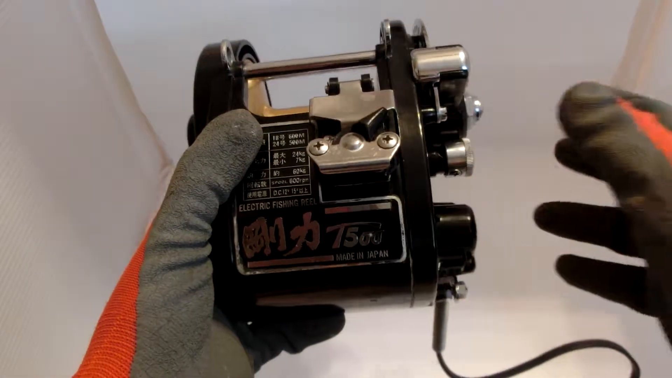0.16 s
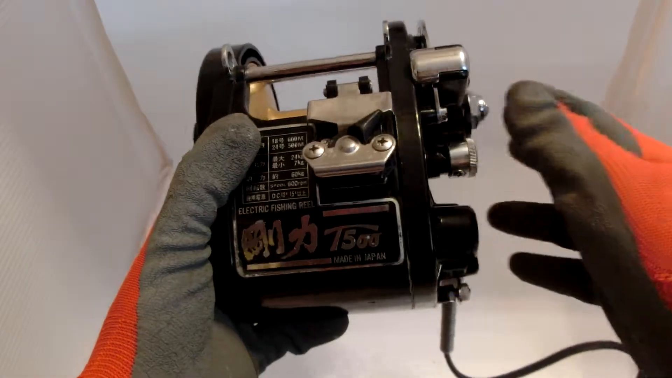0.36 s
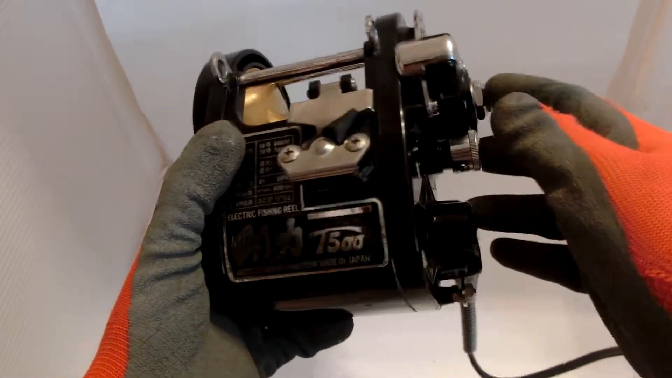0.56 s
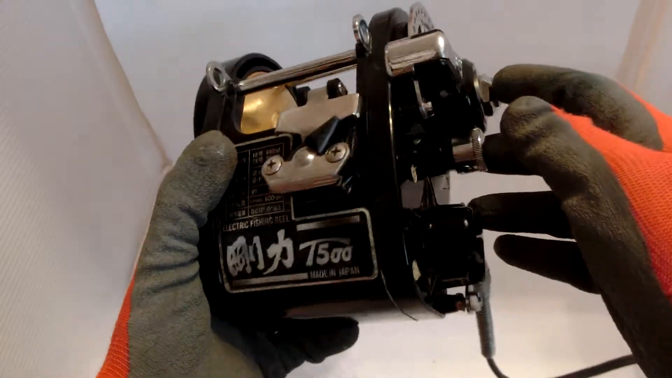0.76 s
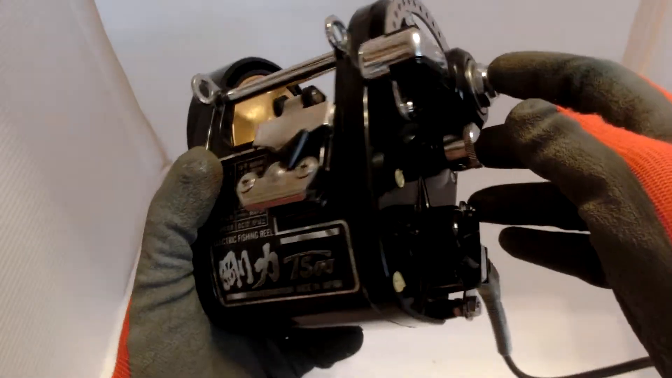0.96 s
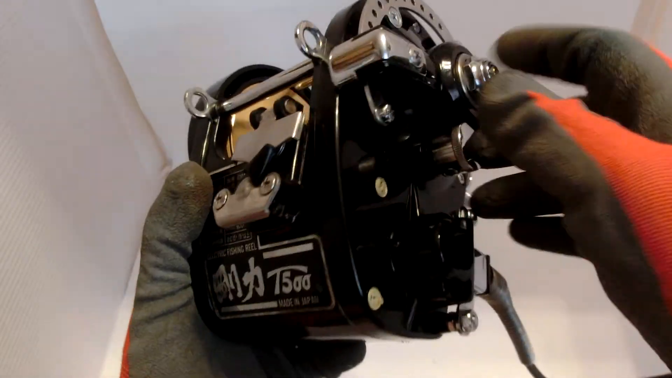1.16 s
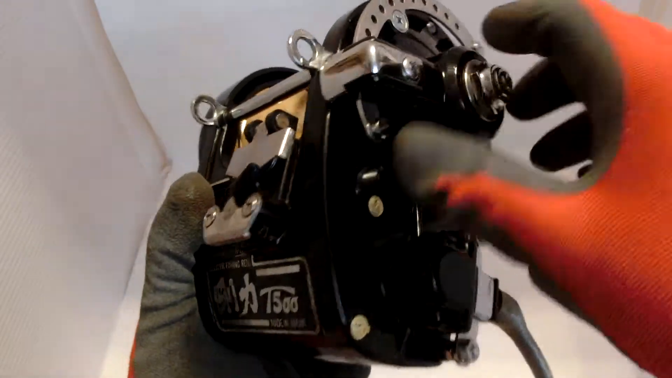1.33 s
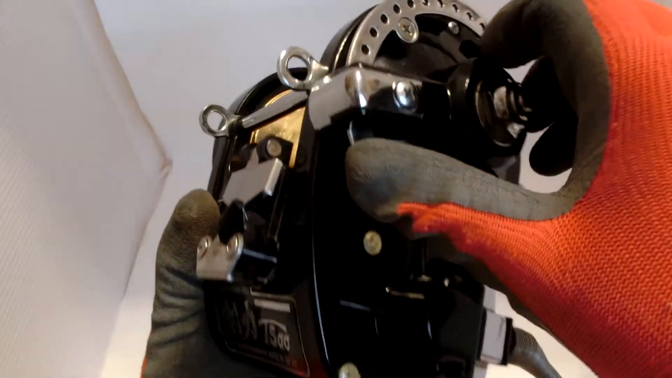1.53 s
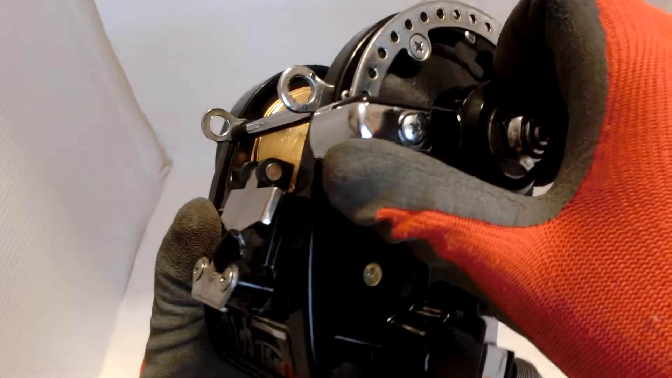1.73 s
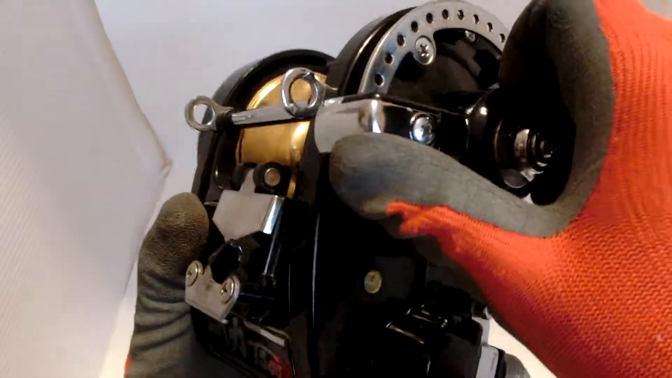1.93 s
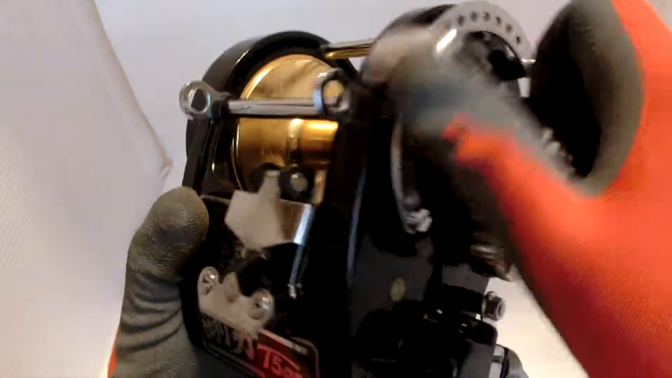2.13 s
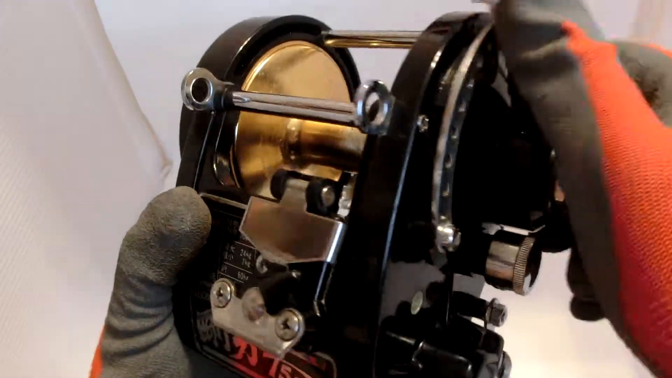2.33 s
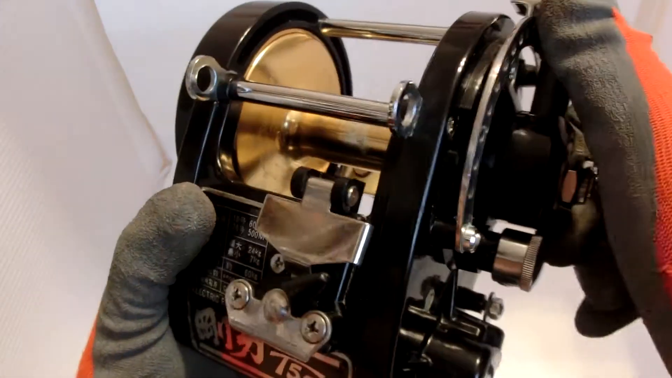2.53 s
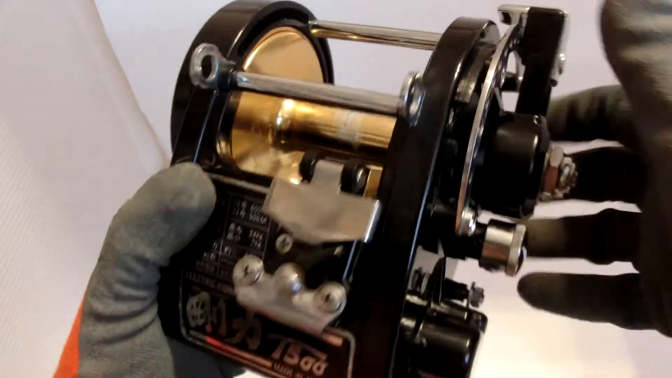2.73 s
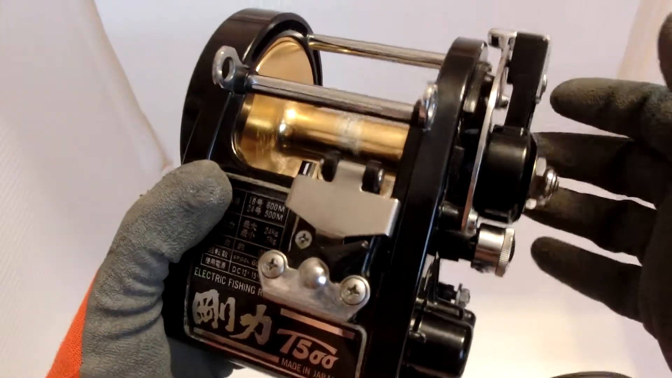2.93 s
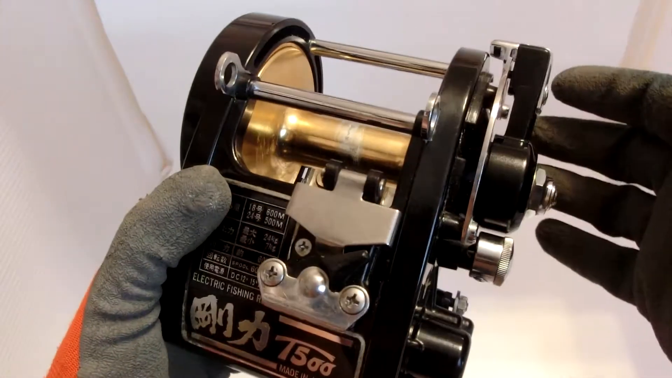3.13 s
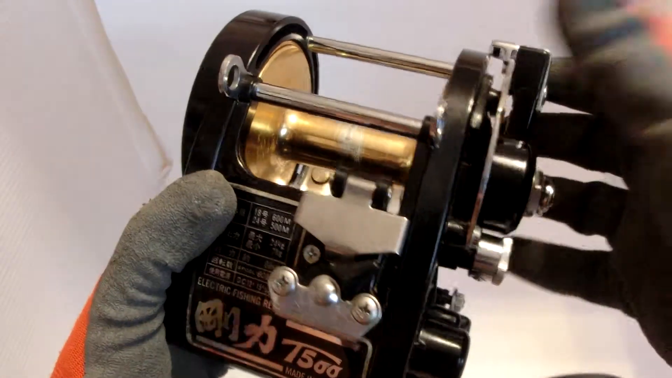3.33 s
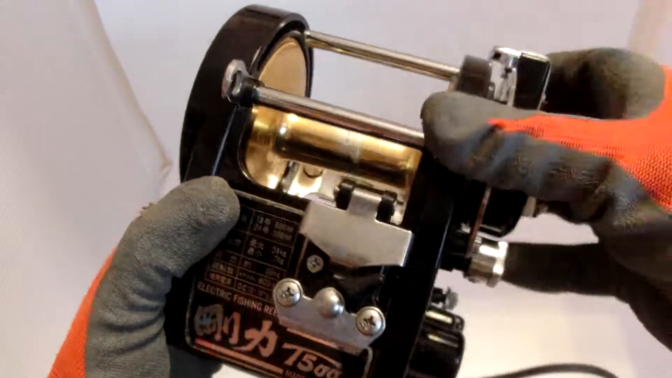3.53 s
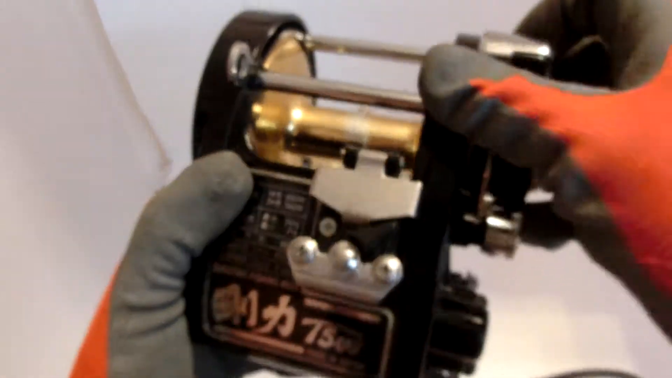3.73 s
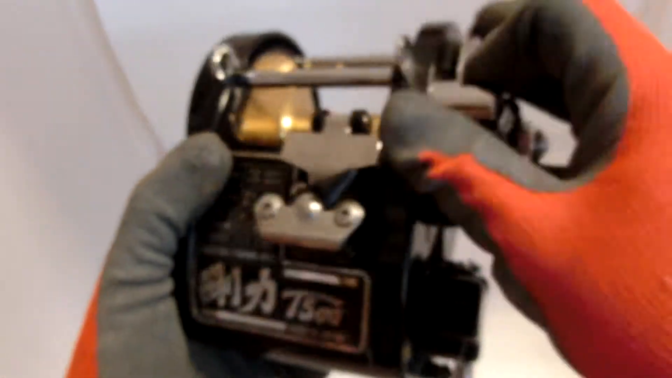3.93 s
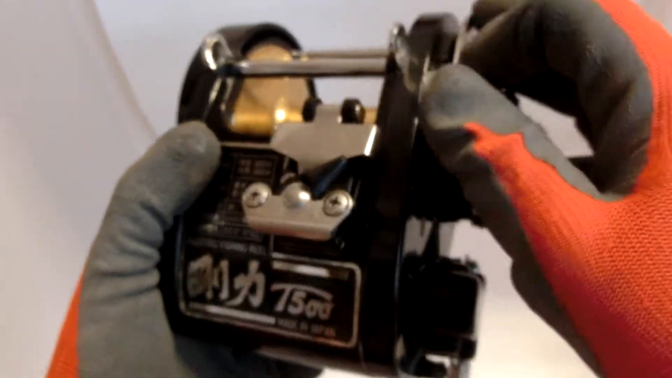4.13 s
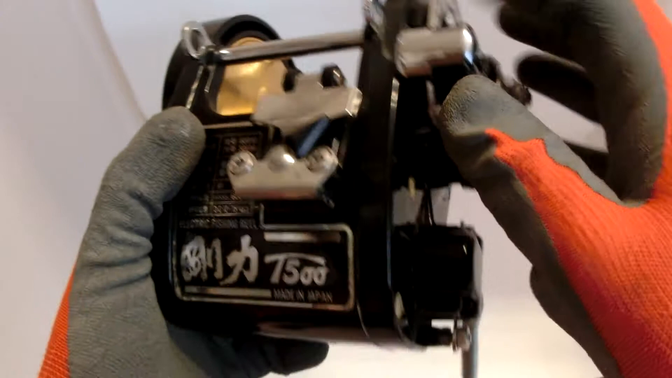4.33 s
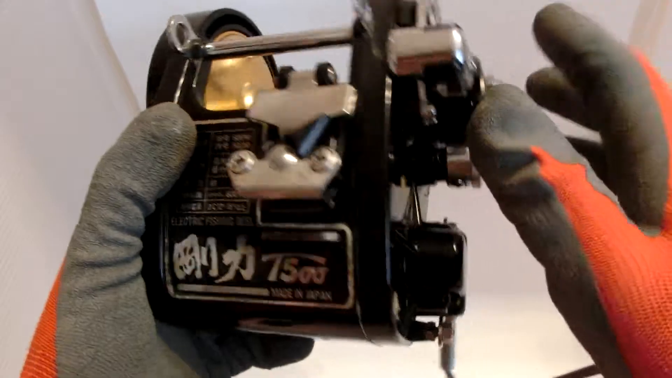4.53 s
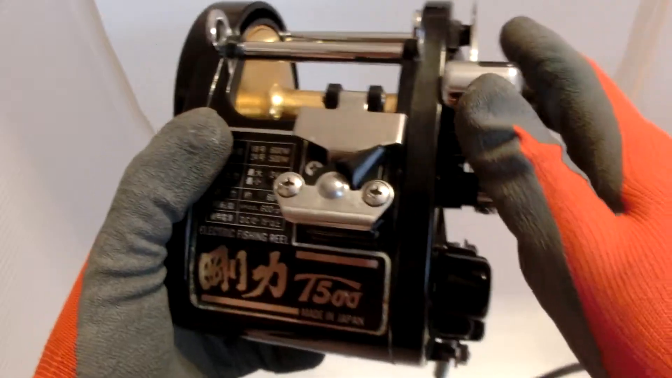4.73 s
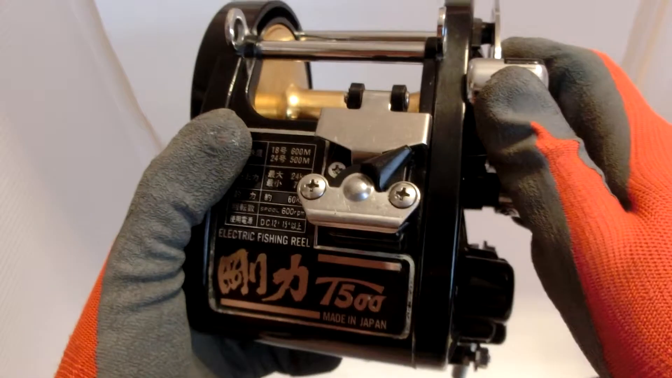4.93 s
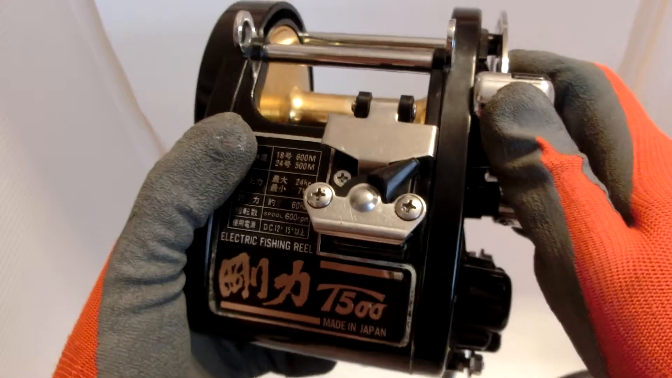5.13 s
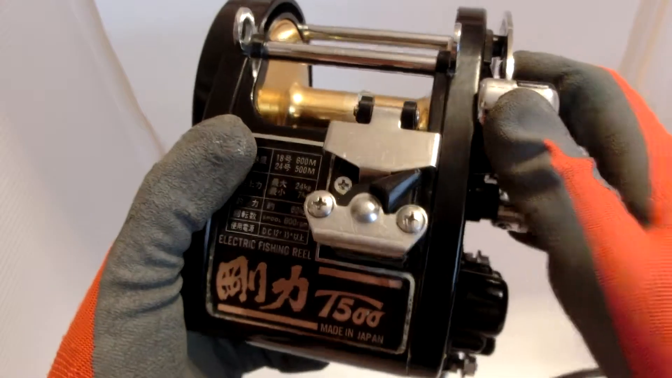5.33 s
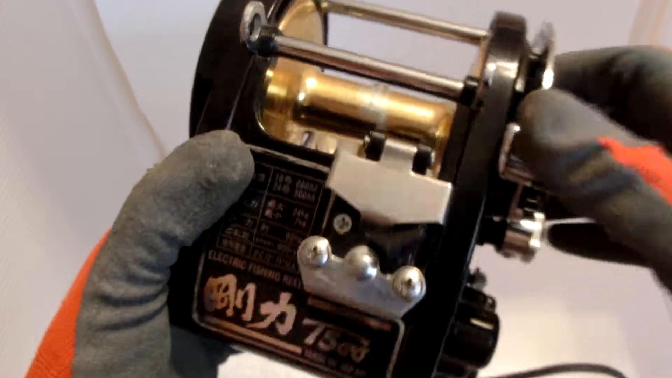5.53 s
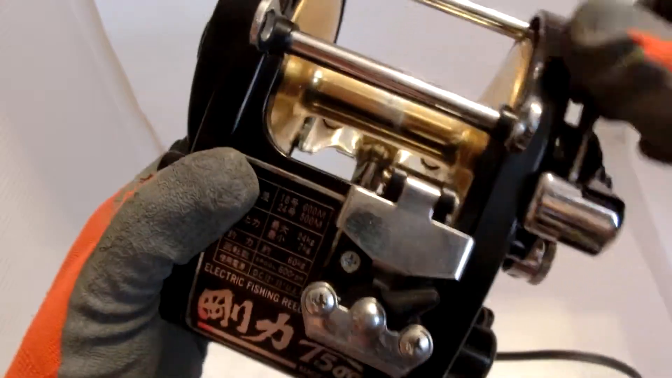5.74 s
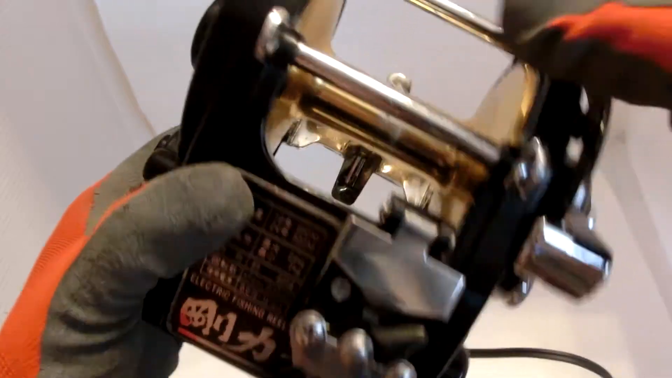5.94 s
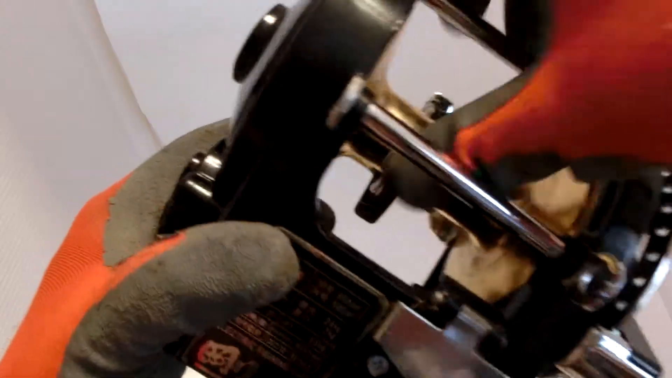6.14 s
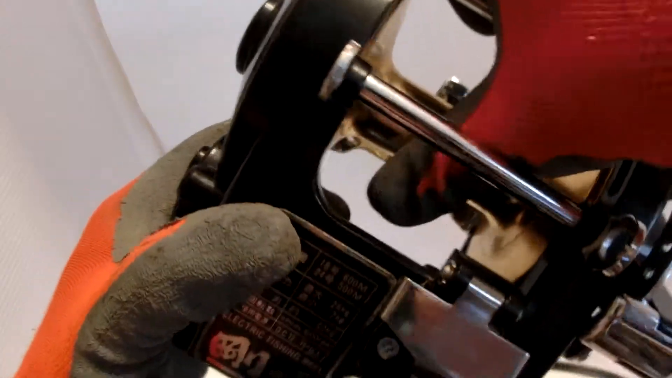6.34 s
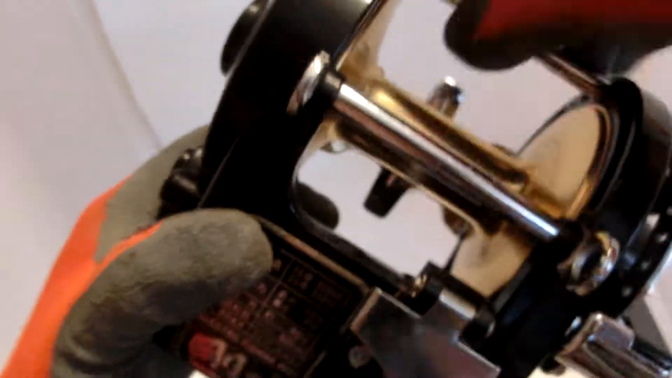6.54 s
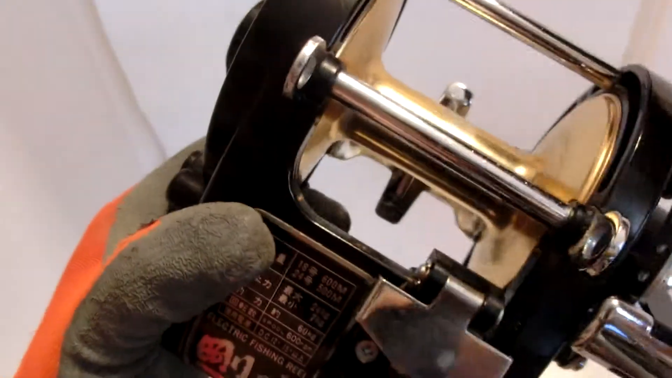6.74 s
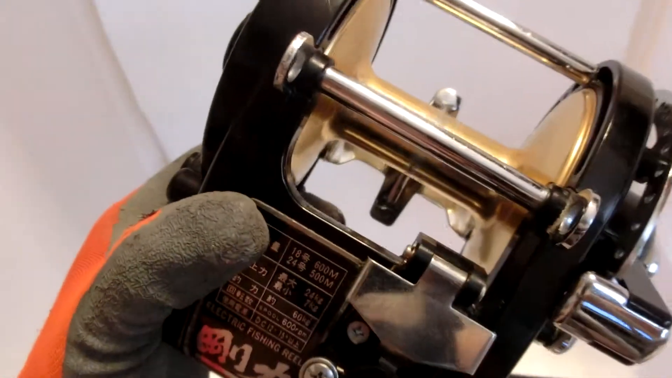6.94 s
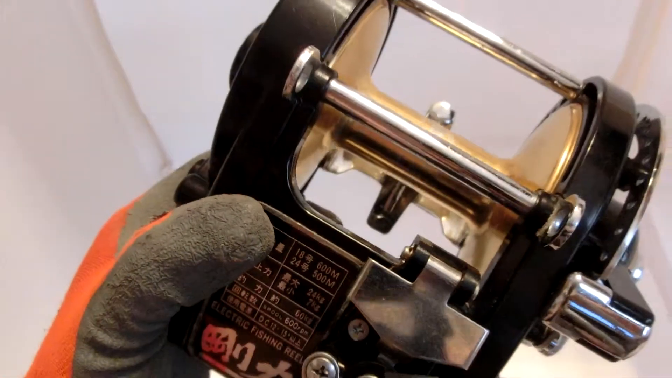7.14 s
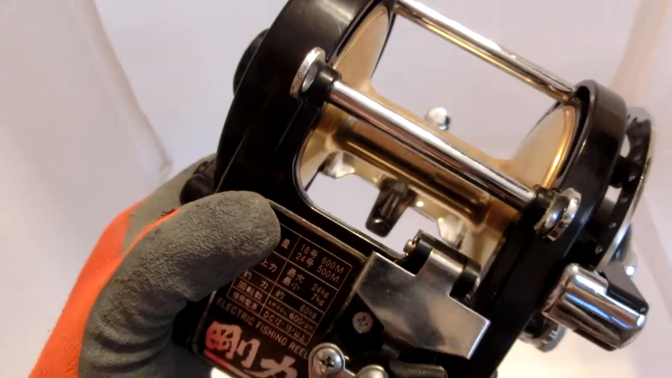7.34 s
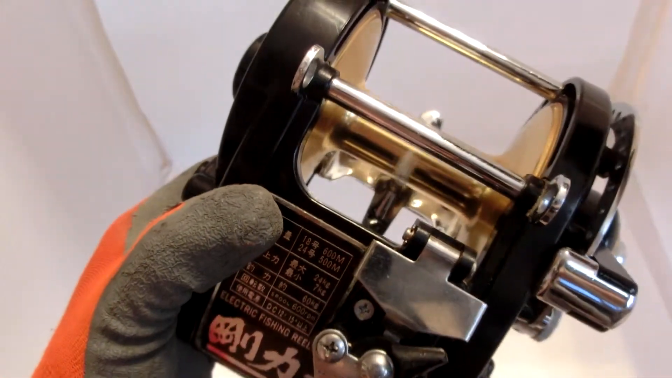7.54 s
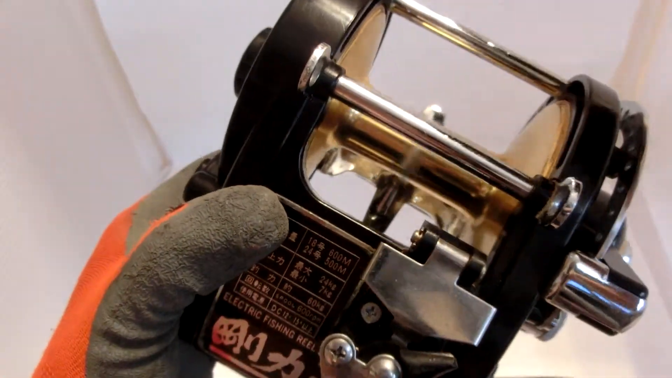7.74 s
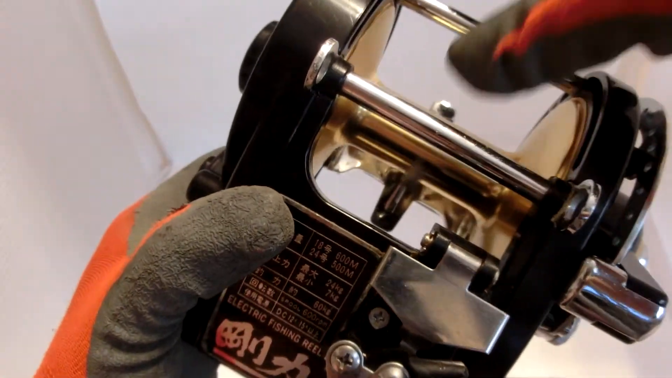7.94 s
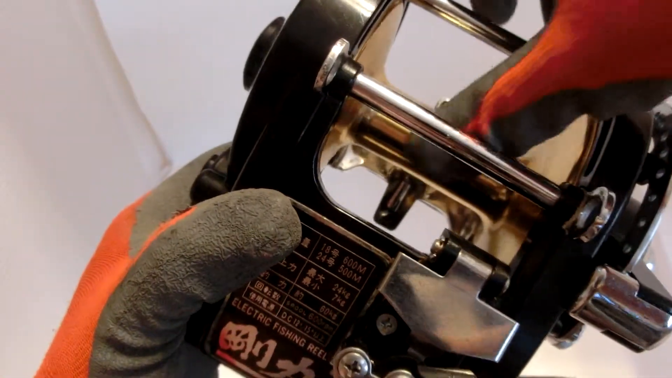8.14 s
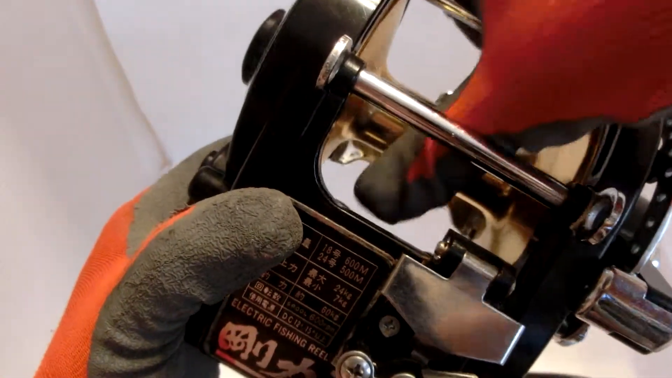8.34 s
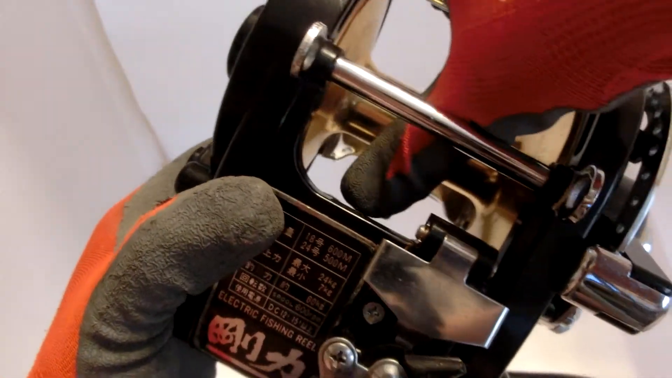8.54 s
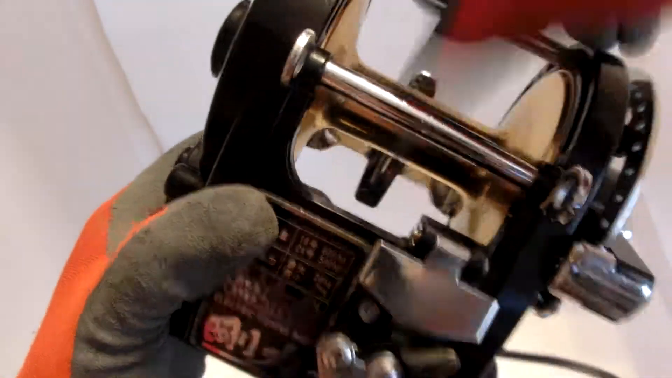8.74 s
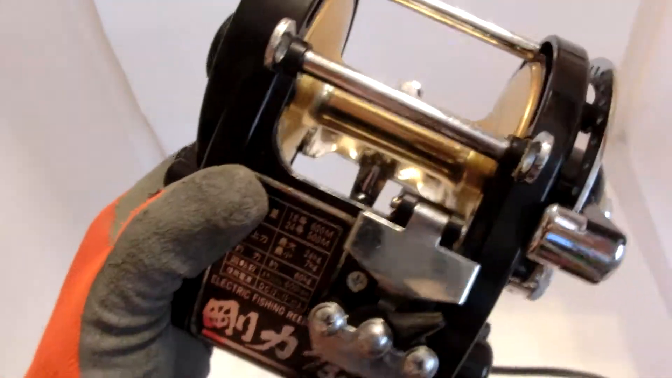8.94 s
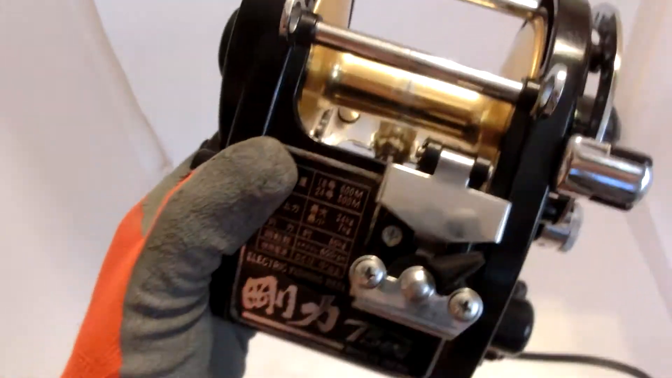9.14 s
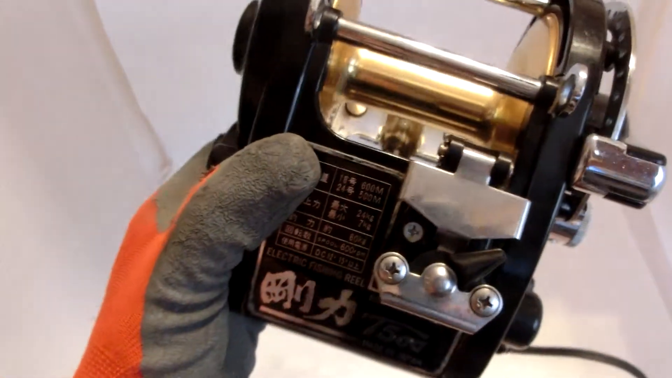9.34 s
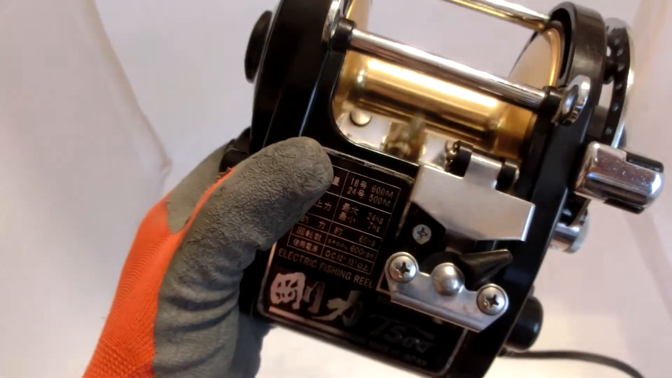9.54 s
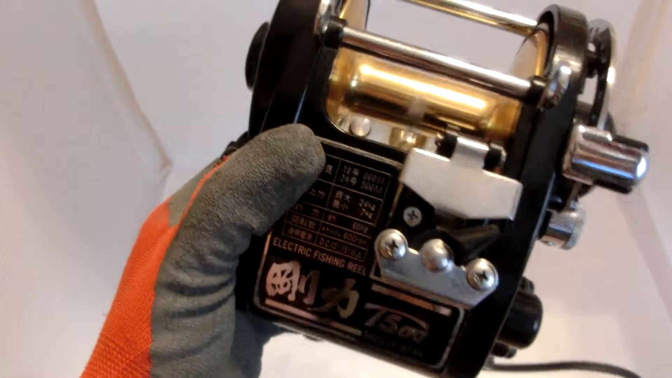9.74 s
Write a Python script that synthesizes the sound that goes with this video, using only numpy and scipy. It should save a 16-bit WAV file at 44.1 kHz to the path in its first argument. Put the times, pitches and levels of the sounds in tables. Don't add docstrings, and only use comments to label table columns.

```python
import sys
import numpy as np
from scipy import signal
from scipy.fft import rfft, irfft, next_fast_len
from scipy.io import wavfile
from scipy.ndimage import uniform_filter1d, map_coordinates

SR = 44100
rng = np.random.default_rng(int(sys.argv[2]) if len(sys.argv) > 2 else 0)


def amplitude_ratio(level_db):
    exponent = np.asarray(level_db, float) / 20
    return 10 ** exponent


def to_wav(sig):
    pcm = np.clip(np.atleast_2d(sig), -1, 1) * 32767
    pcm = np.round(pcm).astype(np.int16)
    wavfile.write(sys.argv[1], SR, pcm.T)


N = 431298
TIME_S = np.arange(N) / SR

# time in seconds, tick in dB, plate in dB, housing in dB, loudest plate pitch in Hz.
KNOB_STEPS = [(1.866, -7, -28, -33.5, 5900), (2.0486, -4.5, -26.5, -22.5, 5300),
              (2.0747, -8, -26.5, -31.5, 5650), (2.0844, -23, -41, -40, 2450),
              (2.1328, -4.5, -28, -30.5, 5600), (2.169, -6.5, -26.5, -31, 5030),
              (2.2118, -8.5, -22, -27.5, 4130), (2.2523, -7, -33.5, -29, 4820),
              (2.3134, -10, -28.5, -35.5, 4940), (2.3691, -11.5, -27.5, -40.5, 5500),
              (2.4273, -17.5, -35, -52.5, 5560)]
LEVER_STEPS = [
    (3.6017, -7.5, -14.5, -27.5, 5200),
    (3.6139, -7.5, -17, -21.5, 4130),
    (3.6308, -9, -14, -21, 2930),
    (3.6468, -9.5, -13.5, -21, 2540),
    (3.6731, -14, -25, -29.5, 2530),
    (3.7678, -16.5, -17, -27, 4270),
    (3.8014, -12.5, -16.5, -22.5, 4290),
    (3.836, -12.5, -20, -22.5, 4200),
    (3.8805, -11, -14.5, -20.5, 3900),
]
# centre in Hz, width in Hz, level in dB.
PAWL_MODES = [(6300, 990, -5.5), (7850, 520, 2), (8900, 1300, 1.5), (10600, 1300, -2.5),
              (12200, 1800, -1.5), (14600, 2100, 1)]
KNOB_PLATE_MODES = [(3330, 790, -5.5), (4270, 350, -1.5), (4780, 220, 0), (5650, 270, -2.5)]
KNOB_HOUSING_MODES = [(910, 410, -1.5), (1331, 300, 0), (1590, 260, 0), (2500, 240, 3)]
LEVER_PLATE_MODES = [(3020, 600, -4), (4230, 380, -1), (5050, 500, -4), (5500, 300, -4)]
LEVER_HOUSING_MODES = [(940, 260, -6.5), (1660, 300, 0), (2190, 190, -1), (2490, 190, 2)]
AXLE_MODES = [(448, 82, -2.5), (725.7, 260, -0.5), (975, 380, -0.5), (1584, 220, 0)]
FLANGE_MODES = [(2400, 86, -8.5), (2663, 160, -1.5), (3000, 220, -4), (3140, 81, 1), (3278, 70, 2),
                (3800, 180, -10.5), (4255, 240, -5.5), (4660, 90, -5), (5140, 400, -11)]
RACE_MODES = [(5674, 260, -12), (6014, 210, -8), (7070, 94, -5), (7400, 110, 0), (7520, 70, -5.5),
              (7676, 350, -12)]
BALL_MODES = [(8900, 500, -15), (9420, 150, -12), (10060, 300, -10), (10620, 330, -3), (11100, 200, -11),
              (12550, 300, -14.5), (13950, 260, 2)]
# frequency in Hz, level in dB per Hz.
SNAP_SPECTRUM = [(47, -51), (80, -21), (680, -17), (951, -13), (1330, -7), (1660, -3.5), (1940, -9.5),
                 (4140, -11), (6330, -7), (8640, 0), (11800, -14), (14100, -7), (16500, -30)]
# frequency in Hz, level in dB, T60 in seconds.
FRAME_RODS = [(2540, 0.5, .2), (2260, -6.5, 0.13), (4203, -4.5, 0.25), (4270, -7, .2), (1620, -8, 0.074),
              (8850, -10.5, .2)]
# push, spin-up, brake and heavy-side passing time, all in seconds, then turns per second.
SPINS = [
    (6.395, .06, 8.3, 6.469, 8.52),
    (8.72, .025, 9.9, 8.778, 8.19),
]
# place in turns, fade in turns, rise in dB.
TIGHT_SPOTS = [(.1, .04, 3.5), (.31, .065, 7.5), (.59, .035, 4), (.835, .08, 6.8)]
# time in seconds, thud in dB, housing in dB.
FLICKS = [
    (6.478, -22.5, -21),
    (8.713, -21.5, -16.5),
]
# time in seconds, peak in dB, centre in Hz.
FINGER_TAPS = [(0.075, -36.5, 1087), (1.751, -35.5, 934), (3.518, -41, 934), (4.25, -48, 2580),
               (4.629, -45.5, 3270), (5.803, -47.5, 1130), (6.254, -45, 995), (6.474, -21.5, 2813),
               (6.484, -20, 1090), (6.578, -27.5, 2476), (8.712, -22.5, 1050), (8.724, -21.5, 1076)]
# time in seconds, peak in dB, centre in Hz.
LOOSE_TICKS = [(0.6686, -51, 3720), (1.1694, -50, 11200), (1.2077, -48, 11900), (2.4722, -31, 2880),
               (5.1356, -47.5, 11700), (6.277, -48, 11500), (6.4655, -31, 3200), (6.4846, -13, 3070),
               (7.186, -37, 7380), (8.219, -34.5, 4100), (8.248, -40, 3900), (8.335, -42, 9000),
               (8.3535, -30, 3900), (8.3848, -32.5, 3600), (8.3848, -37, 10500), (8.4214, -35, 4300),
               (8.565, -50, 3300), (8.7122, -14, 3070)]
# time in seconds, peak in dB, centre in Hz, width in Hz.
BLIPS = [
    (.059, -47, 480, 300),
    (.074, -47, 4400, 3000),
    (1.752, -49, 2500, 90),
    (4.54, -54, 945, 60.2),
    (5.56, -56, 3000, 900),
]
# firmest contact in seconds, level in dB, 20 dB rise in seconds, 20 dB fade in seconds.
GLOVE_STROKES = [(.076, -58, .012, .08), (.902, -55.5, .02, .055), (1.152, -60, .09, .06),
                 (1.35, -72, 1.4, .9), (1.634, -61.5, .3, .08), (1.84, -64, .04, .02),
                 (2.03, -35.5, .006, .035), (2.676, -53, .1, .05), (2.902, -61, .07, .1),
                 (3.5, -65.5, .6, .08), (3.584, -33, .012, .015), (4.25, -66, .13, .13),
                 (4.63, -52.5, .005, .06), (5.14, -70, .02, .06), (5.75, -68, .9, .2),
                 (5.81, -56, .06, .06), (5.89, -62, .15, .16), (6.3, -63, .8, .2), (6.46, -49, .09, .03),
                 (6.48, -35.5, .03, .04), (8.425, -56, .35, .04), (8.5, -64, .2, .4), (6.405, -55, .02, .3),
                 (8.69, -47, .07, .1), (8.714, -33, .03, .02), (8.745, -46, .03, .03)]
# frequency in Hz, level in dB per Hz.
RUBBER_SPECTRUM = [(410, -34.5), (700, -3), (971, -0.5), (1660, -3.5), (3200, -1.5), (6320, -5), (9480, -8),
                   (16000, -10)]
# frequency in Hz, left-right likeness.
REEL_ALIKE = [(60, 0.7), (130, 0.51), (290, 1), (640, 1), (1410, 0.96), (3100, 0.95), (6820, 0.8),
              (15000, 0.13)]
# frequency in Hz, left minus right in dB.
REEL_BALANCE = [(60, -1), (300, 3), (1300, 0.2), (4400, 1), (8000, 2.2), (15000, -1.6)]
# frequency in Hz, T60 in seconds.
WALL_T60 = [(300, 0.19), (2500, .3), (8000, 0.21), (15000, 0.32)]
# frequency in Hz, level in dB per Hz.
ROOM_SPECTRUM = [(12, -32), (20, 1), (48, -4), (117, -5.5), (188, -13), (364, -9.5), (494, -12.5),
                 (707, -12.5), (790, -17), (1300, -23), (3060, -27), (3610, -27), (3930, -28.5),
                 (14800, -30.5)]
# frequency in Hz, left-right likeness.
ROOM_ALIKE = [(60, 0.67), (130, 0.75), (290, 0.55), (640, 0.69), (1410, 0.15), (3100, 0.14), (6820, -0.025),
              (15000, -0.01)]
# on in seconds, off in seconds, level in dB re room tone.
WHINE = [
    (0.17, .71, -18.5),
    (2.72, 2.9, -21),
    (3.12, 3.35, -15.5),
    (5.3, 5.68, -28),
]
CLOCK_S = np.arange(10) * .9975 + .893
# time in seconds, depth in dB.
GAIN_DIPS = [
    (2.2, -2.3),
    (3.62, -6),
    (6.6, -1.3),
    (8.7, -1.5),
]
# frequency in Hz, gain in dB.
MIC_RESPONSE = [(14200, 0), (15000, -4.5), (15300, -13.5), (15650, -2.5), (15900, -28.5), (16800, -37)]


def detents(steps, lag_s, plate, housing, tick_t60_s, plate_t60_s, housing_t60_s,
            trim_db, snap_db, jolt_db, rods_db):
    out = np.zeros((2, N))
    for s, tick_db, plate_db, housing_db, plate_hz in steps:
        answer_s = s + lag_s
        tick = burst(tick_t60_s, .00006, body(PAWL_MODES, 1.6, .03), -14.5, 8.5)
        add(out, s + .0006, amplitude_ratio(tick_db + 1.5) * tick)
        ring = burst(plate_t60_s, .00023, body(plate, 2.8, .014), -27.5, 7.3)
        add(out, answer_s, amplitude_ratio(plate_db + trim_db) * ring)
        peak = burst(.02, .0002, body([(plate_hz, 450, 0)]), -29, 4)
        add(out, answer_s, amplitude_ratio(plate_db + trim_db + 1.8) * peak)
        knock = burst(housing_t60_s, .0003, body(housing, 1.9, .015), -21, 6.7)
        add(out, s + 1.3 * lag_s, amplitude_ratio(housing_db + trim_db) * knock)
        snap = burst(plate_t60_s, .00007, lambda hz: amplitude_ratio(along(SNAP_SPECTRUM, hz)), -14.5, 6.8)
        add(out, answer_s, amplitude_ratio(plate_db + snap_db) * snap)
        add(out, answer_s, amplitude_ratio(housing_db + rods_db) * rods())
        jolt = burst(.054, .0018, body([(151, 150, -6.5), (448, 310, 1)], 3.1))
        add(out, answer_s, amplitude_ratio(housing_db + jolt_db) * jolt)
    return out


def rods():
    t = np.arange(SR // 3) / SR
    ring = 0
    for (hz, db, t60_s), (u, v) in zip(FRAME_RODS, rng.standard_normal((len(FRAME_RODS), 2))):
        ring = ring + amplitude_ratio(db + 2.5 * u - 60 * t / t60_s) * np.sin(2 * np.pi * hz * (1 + .003 * v) * t)
    return ring * (1 - np.exp(-t / .0017)) * [[1], [0]]


def spool():
    drag_turns_per_s2, full_turns_per_s, brake_s = 2.87, 8., .14
    creeps_s, creep_speed = [(6.29, 6.35), (8.48, 8.53)], .13
    first = round((creeps_s[0][0] - .1) * SR)
    turn, speed = np.zeros((2, N))
    for go, spin_up, brake, passes, rate in SPINS:
        on = gate(go, brake, spin_up, brake_s)
        t = TIME_S - passes
        turn += (on > 0) * (rate * t - drag_turns_per_s2 * t ** 2 / 2)
        speed += on * np.clip(rate - drag_turns_per_s2 * t, 0, None) / full_turns_per_s
    speed += creep_speed * sum(gate(a, b, .01, .01) for a, b in creeps_s)
    turn, speed = turn[first:], speed[first:]
    noise = lambda: rng.standard_normal((2, N - first))
    load = np.cos(2 * np.pi * (turn - .04))
    tight_db = 0
    for place, fade, db in TIGHT_SPOTS:
        past = (turn - place + .5) % 1 - .5
        width = np.where(past < 0, .45 * fade, fade)
        tight_db = tight_db + db * np.exp(-.5 * (past / width) ** 2)
    swell_db = 3.1 * load + .9 * np.cos(4 * np.pi * turn) + .8 * np.cos(12 * np.pi * turn)
    swell_db += 1.1 * wobble(40)[first:]
    axle = unit(amplitude_ratio(swell_db) * filtered(noise(), ringing(AXLE_MODES, -13)))
    out = amplitude_ratio(-52) * speed ** .85 * axle
    # modes, level in dB, growth with speed, bed in dB, load in dB, share of tight spots, grit in dB.
    parts = [(FLANGE_MODES, -51.7, 1.1, -21, 1.9, .85, 1.7),
             (RACE_MODES, -48.5, 1.15, -25, .3, .95, 1.7),
             (BALL_MODES, -54.7, .95, -21, .2, .8, 1.8)]
    for modes, db, grows, bed_db, load_db, share, grit_db in parts:
        rough_db = (grit_db * wobble(150) + 1.1 * wobble(50))[first:]
        rolling = amplitude_ratio(load_db * load + share * tight_db + rough_db) * noise()
        hz, t, z = signal.stft(filtered(rolling, ringing(modes, bed_db)), nperseg=512)
        patches = uniform_filter1d(rng.standard_normal(z.shape[1:]), size=4, axis=0)
        patches = uniform_filter1d(patches, size=5, axis=1)
        rung = signal.istft(z * amplitude_ratio(1.7 * unit(patches)), nperseg=512)[1][:, :N - first]
        out += amplitude_ratio(db) * speed ** grows * unit(rung)
    return np.pad(out, [(0, 0), (first, 0)])


def handling():
    out = np.zeros((2, N))
    for rows, t60_s in (FINGER_TAPS, .03), (LOOSE_TICKS, .008):
        for s, db, hz in rows:
            add(out, s, amplitude_ratio(db) * burst(t60_s, .00013, body([(hz, .68 * hz, 0)])))
    for s, thud_db, housing_db in FLICKS:
        thud = burst(.085, .0066, body([(65.6, 54, 9), (244, 140, -11.5)]))
        add(out, s - .008, amplitude_ratio(thud_db) * thud * [[1], [.2]])
        knock = burst(.059, .003, body([(610, 490, -2.5), (1050, 240, 2), (2170, 870, -8.5)]))
        add(out, s, amplitude_ratio(housing_db) * knock)
    for s, db, hz, width_hz in BLIPS:
        add(out, s, amplitude_ratio(db) * burst(.05, .004, body([(hz, width_hz, 0)])))
    grains = amplitude_ratio(1.9 * wobble(150)) * rng.standard_normal((2, N))
    scrape = unit(filtered(grains[::-1], body([(9000, 9000, 0)])))
    out += amplitude_ratio(-46.5) * gate(8.605, 8.7, .03, .03) * scrape
    knot_s = np.arange(0, N / SR, 1 / 1000)
    power = 0
    for s, db, rise, fade in GLOVE_STROKES:
        away = np.maximum((s - knot_s) / rise, (knot_s - s) / fade)
        power = power + amplitude_ratio(2 * (db - 20 * away))
    rubbing = unit(filtered(grains, lambda hz: amplitude_ratio(along(RUBBER_SPECTRUM, hz))))
    return out + np.interp(TIME_S, knot_s, np.sqrt(power)) * rubbing


def walls(x):
    out = np.zeros((2, N))
    for start in range(0, N, SR // 4):
        hz, t, z = signal.stft(rng.standard_normal((2, SR // 3)), SR, nperseg=256)
        decay = amplitude_ratio(-60 * t / along(WALL_T60, hz)[:, None])
        tail = signal.istft(z * decay, SR, nperseg=256)[1]
        tail = tail / np.linalg.norm(tail[0])
        add(out, start / SR + .004, signal.fftconvolve(x[:, start:start + SR // 4], tail, axes=1))
    return out


def room():
    tone = unit(filtered(rng.standard_normal((2, N)), lambda hz: amplitude_ratio(along(ROOM_SPECTRUM, hz))))
    whine = sum(amplitude_ratio(db) * gate(on, off, .05, .05) for on, off, db in WHINE)
    tone += whine * amplitude_ratio(3 * wobble(25)) * np.sin(2 * np.pi * 3730 * TIME_S) * [[1], [.3]]
    for s in CLOCK_S:
        add(tone, s, amplitude_ratio(3) * burst(.25, .0066, body([(3580, 700, .5), (5200, 1700, -3.5)], 2)))
    fall_s, hold_s, recover_db_per_s = .25, .25, 4.2
    gain_db = sum(db * gate(s, s + fall_s + hold_s, fall_s, abs(db) / recover_db_per_s) for s, db in GAIN_DIPS)
    return amplitude_ratio(9 - 65 + gain_db) * ports(tone, ROOM_ALIKE)


def body(modes, scatter_db=0, shift=0):
    db_draw, hz_draw = rng.standard_normal((2, len(modes)))
    held = [(c * (1 + shift * v), w, db + scatter_db * u)
            for (c, w, db), u, v in zip(modes, db_draw, hz_draw)]
    return lambda f: sum((-1) ** k * amplitude_ratio(db) * 1j * f * w / (c * c - f * f + 1j * f * w)
                         for k, (c, w, db) in enumerate(held))


def ringing(modes, between_db):
    low, high = modes[0][0], modes[-1][0]
    wide = modes + [(np.sqrt(low * high), 2.8 * (high - low), between_db)]
    return lambda f: np.sqrt(sum(amplitude_ratio(2 * db) * (f * w) ** 4 / ((c * c - f * f) ** 2 + (f * w) ** 2 + 1) ** 2
                                 for c, w, db in wide))


def burst(t60_s, rise_s, response, late_db=-60, spike_db=-40):
    t = np.arange(SR // 6) / SR
    shape = amplitude_ratio(spike_db - 60 * t / .003) + amplitude_ratio(-60 * t / t60_s) + amplitude_ratio(late_db - 12 * t / t60_s)
    shape = shape * (1 - np.exp(-t / rise_s))
    x = filtered(shape * rng.standard_normal((2, len(t))), response)
    return x / np.sqrt(uniform_filter1d(np.mean(x ** 2, axis=0), size=60).max()) / 2


def ports(pair, alike, balance=((1, 0),)):
    turn = lambda hz: np.arccos(np.clip(along(alike, hz), -1, 1)) / 2
    mid, side = filtered(pair, lambda hz: np.array([np.cos(turn(hz)), np.sin(turn(hz))]))
    stereo = np.array([mid + side, mid - side])
    return filtered(stereo, lambda hz: amplitude_ratio(along(balance, hz) * [[.5], [-.5]]))


def filtered(x, response):
    m = next_fast_len(x.shape[-1] + 4096)
    return irfft(rfft(x, m) * response(np.fft.rfftfreq(m, 1 / SR)), m)[..., :x.shape[-1]]


def along(points, hz):
    f, v = np.transpose(points)
    return np.interp(np.log(hz + 1), np.log(f + 1), v)


def wobble(rate_hz):
    return map_coordinates(rng.standard_normal(int(N * rate_hz / SR) + 4), [TIME_S * rate_hz])


def gate(on, off, rise, fall):
    return np.clip(np.minimum((TIME_S - on) / rise, 1 + (off - TIME_S) / fall), 0, 1)


def unit(x):
    return x / np.sqrt(np.mean(x ** 2) + 1e-20)


def add(track, s, x):
    part = track[:, round(s * SR):][:, :x.shape[1]]
    part += x[:, :part.shape[1]]


def scene():
    clicks = detents(KNOB_STEPS, .0016, KNOB_PLATE_MODES, KNOB_HOUSING_MODES, .019, .042, .052,
                     trim_db=5, snap_db=7, jolt_db=-11, rods_db=-25.5)
    clicks += detents(LEVER_STEPS, .0024, LEVER_PLATE_MODES, LEVER_HOUSING_MODES, .02, .037, .087,
                      trim_db=5.2, snap_db=4, jolt_db=-17.5, rods_db=-15)
    clicks += handling()
    reel = clicks + spool() + amplitude_ratio(-13.5) * walls(clicks)
    return ports(reel, REEL_ALIKE, REEL_BALANCE) + room()


def roll_off(x):
    return signal.sosfilt(signal.butter(12, 16800, fs=SR, output="sos"), x)


def record(dry):
    x = filtered(dry, lambda hz: amplitude_ratio(along(MIC_RESPONSE, hz)))
    x = x / (1 + np.abs(x / .86) ** 6) ** (1 / 6)
    return roll_off(x)


dry = scene()
out = record(dry)
to_wav(out)
```